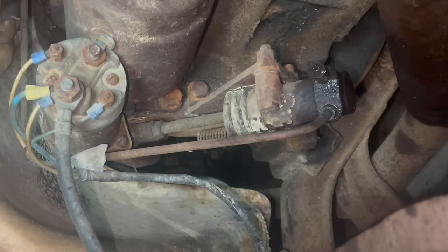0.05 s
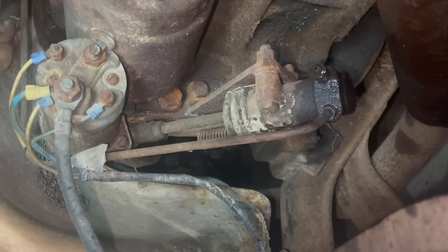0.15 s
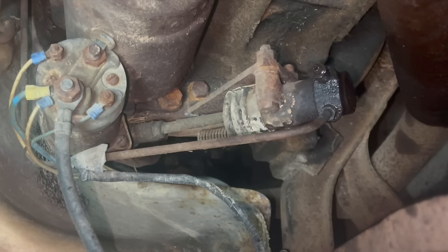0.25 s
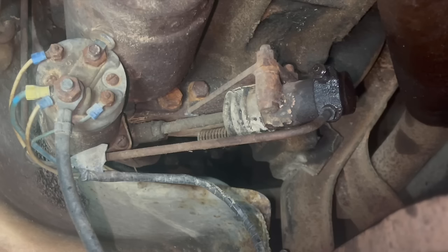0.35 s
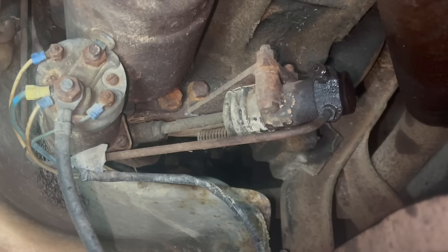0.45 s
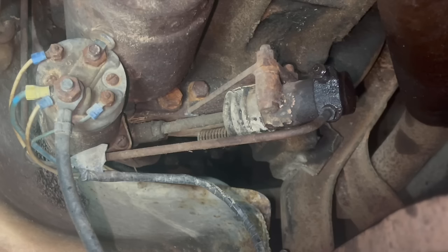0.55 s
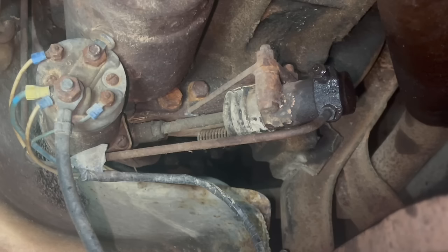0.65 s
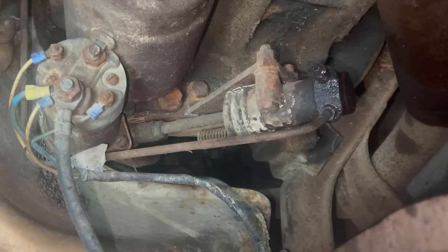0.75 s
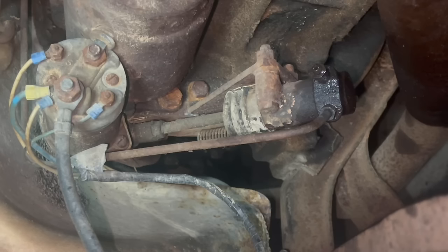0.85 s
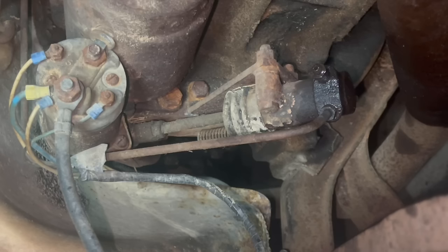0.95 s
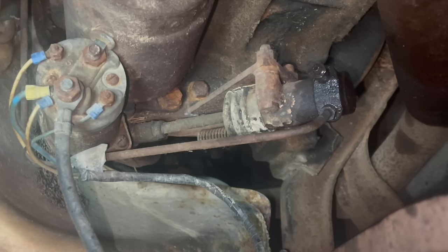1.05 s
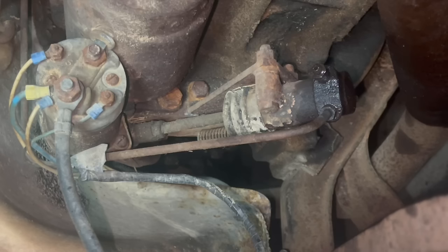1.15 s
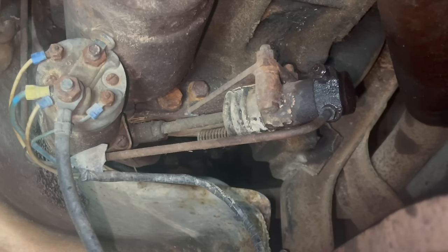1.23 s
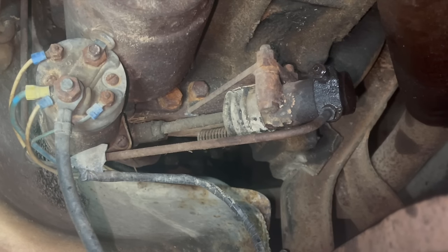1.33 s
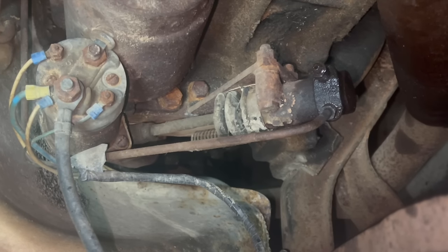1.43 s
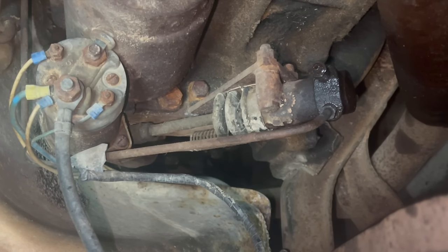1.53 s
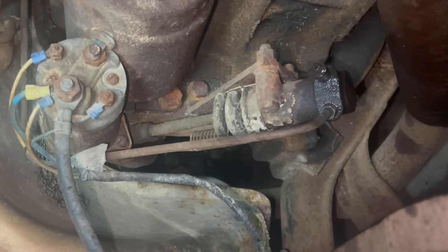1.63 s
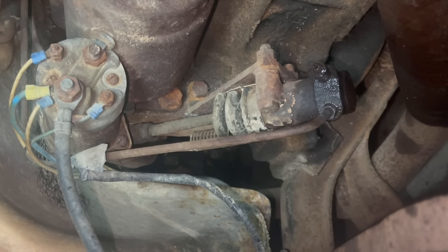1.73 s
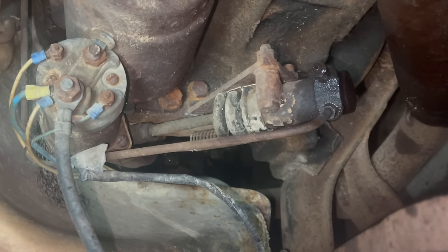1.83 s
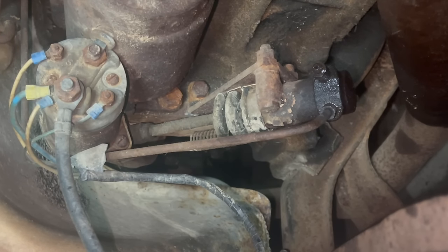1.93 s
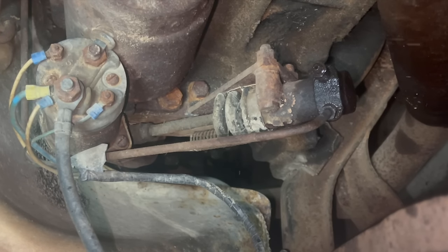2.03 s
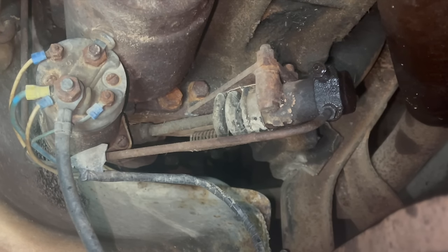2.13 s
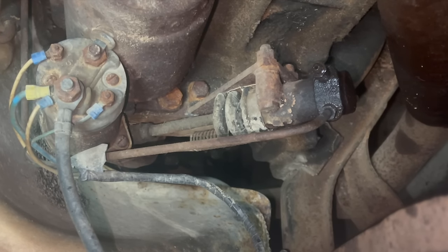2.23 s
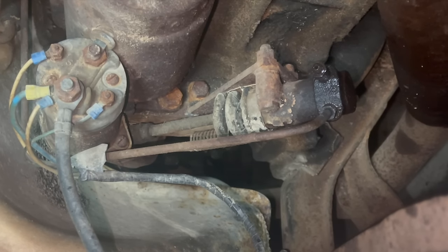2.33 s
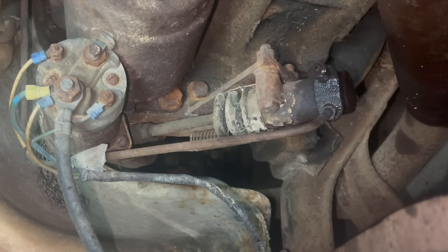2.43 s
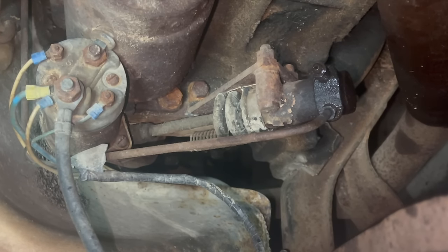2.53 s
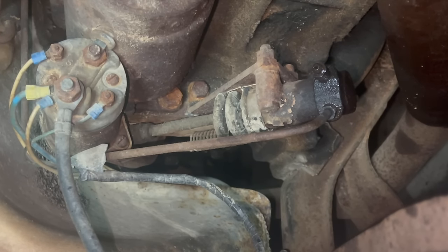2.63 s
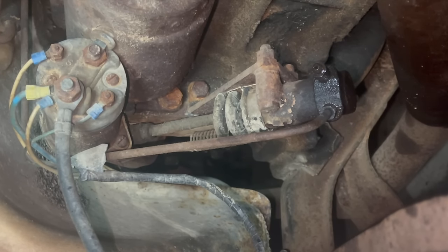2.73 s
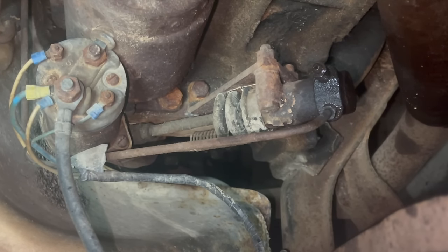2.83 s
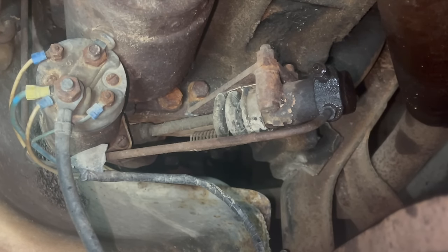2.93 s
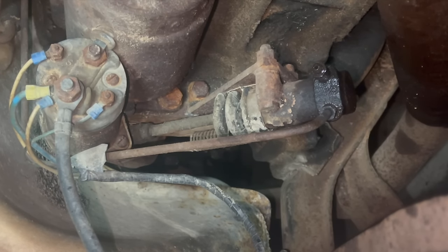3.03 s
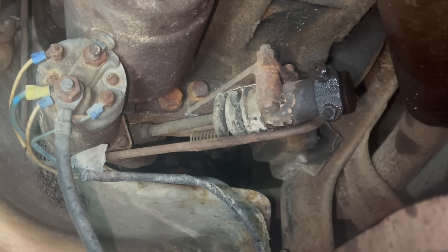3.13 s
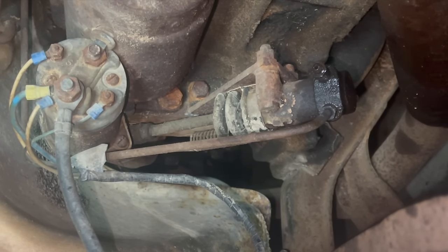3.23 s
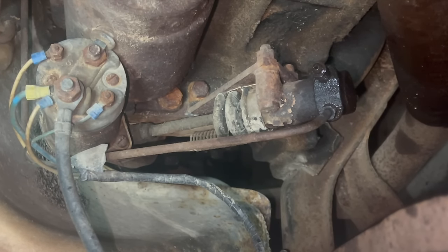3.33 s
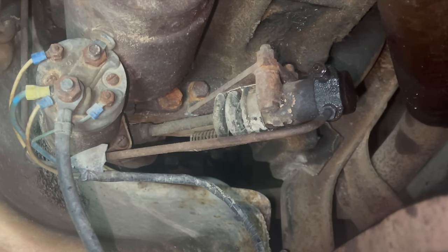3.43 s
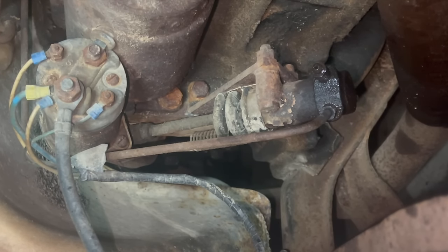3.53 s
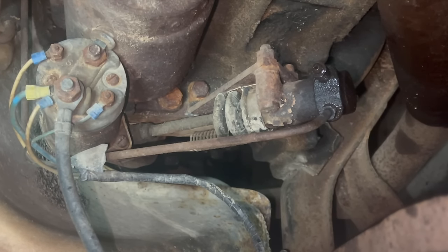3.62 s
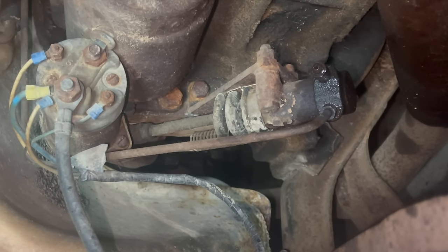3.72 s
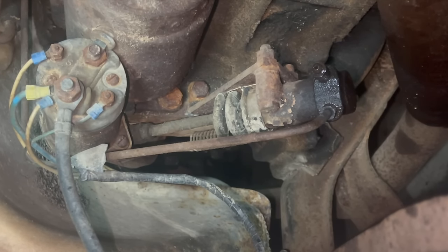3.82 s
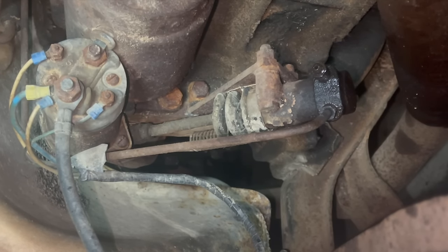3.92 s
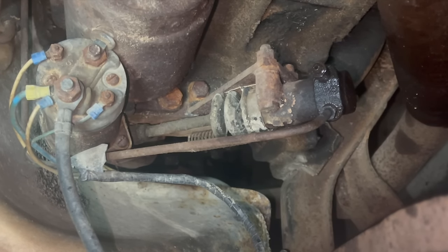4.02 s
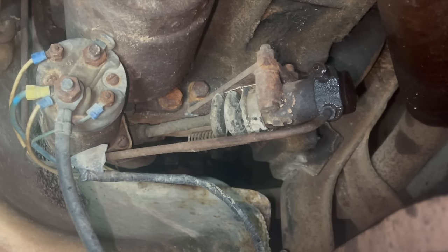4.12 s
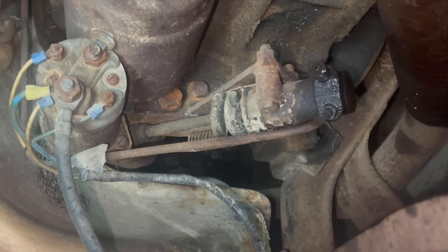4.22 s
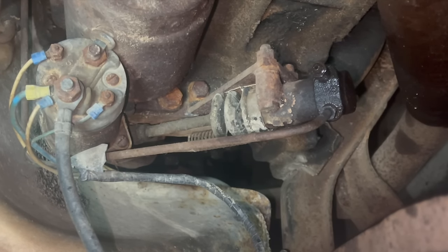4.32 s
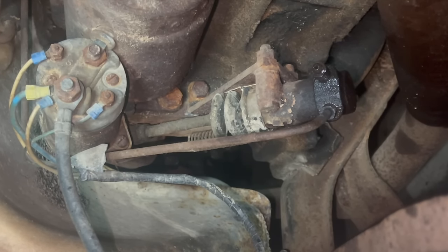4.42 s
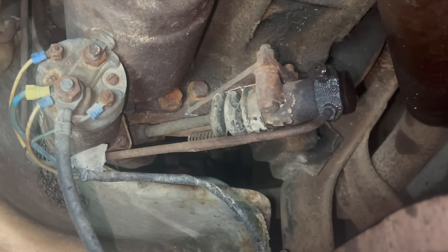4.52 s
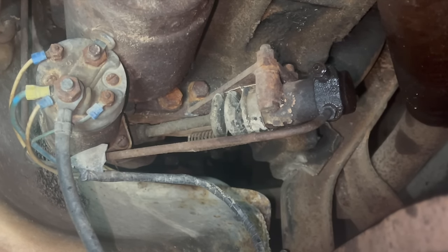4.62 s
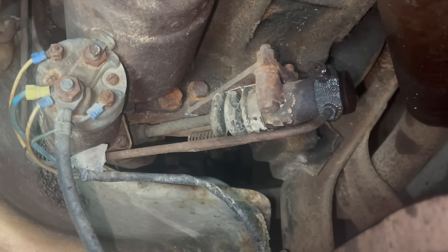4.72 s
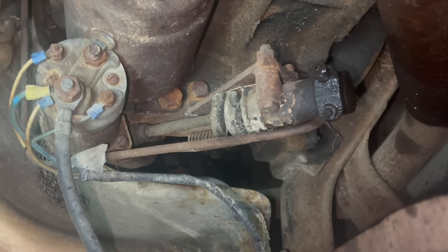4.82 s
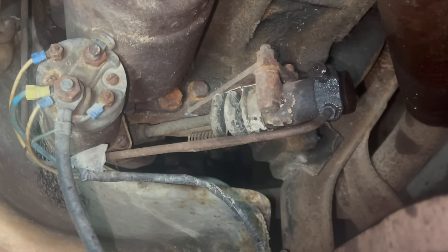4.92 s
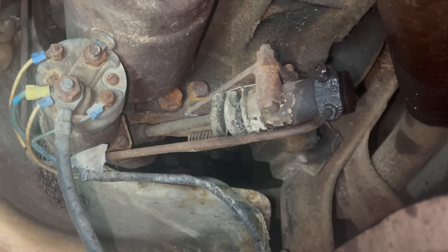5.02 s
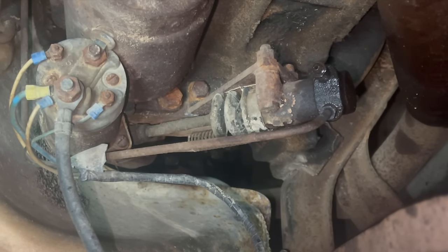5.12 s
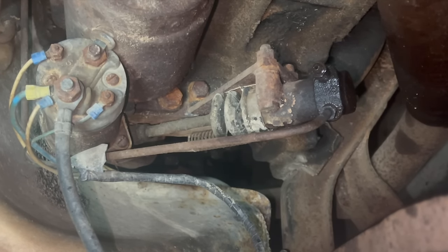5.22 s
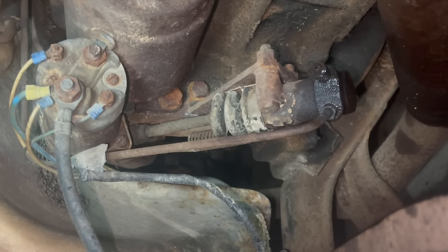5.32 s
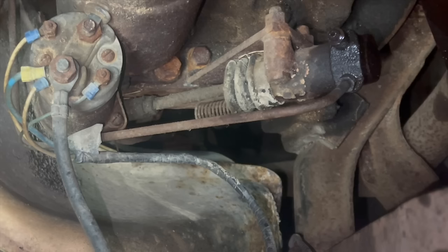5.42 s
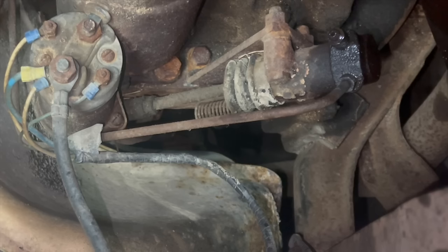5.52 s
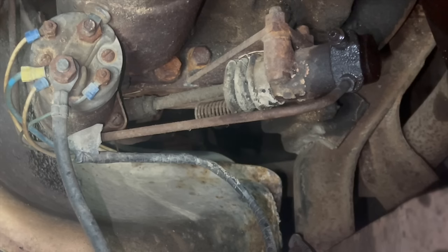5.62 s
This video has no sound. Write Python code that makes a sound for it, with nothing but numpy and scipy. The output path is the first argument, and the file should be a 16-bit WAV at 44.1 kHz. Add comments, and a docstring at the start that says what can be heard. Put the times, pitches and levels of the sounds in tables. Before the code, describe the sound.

Close under a parked vehicle, a steel clutch linkage gives one sharp, rattling clack with dull chassis thumps. Tiny spring ticks follow while a low wind gust buffets the stereo microphone. Faint clicks and soft bumps lead to a much quieter metallic return, then almost inaudible taps. Low rumble, a dull drone and thin hiss continue throughout.

```python
"""A steel clutch linkage is worked under a parked vehicle: one hard rattling knock, a softer return, light clicks.
Contact forces excite the damped modes of its parts; short bursts of contacts ring the return spring.
Dull bumps with sagging pitch thump the chassis. Behind lie coloured noises: rumble, drone, airy middle, thin hiss.
A gust of wind pushes the two microphone ports in opposite sense for a moment while the drone drops out."""
import sys
import numpy as np
from scipy import signal
from scipy.fft import rfft, irfft, next_fast_len
from scipy.io import wavfile
from scipy.ndimage import uniform_filter1d

SR = 44100
rng = np.random.default_rng(int(sys.argv[2]) if len(sys.argv) > 2 else 0)


def master_out(mix):
    """Clip the mix to full scale and print it as 16-bit PCM to the path in sys.argv[1]."""
    frames = np.transpose(np.atleast_2d(mix))
    ceiling = np.clip(frames, -1, 1)
    pcm = np.round(ceiling * 32767).astype(np.int16)
    wavfile.write(sys.argv[1], SR, pcm)


N = 249606  # samples

# Steel-on-steel blows: t/s, relative level/dB, brightness/dB, bracket share/dB.
# Brightness above 0: the blow lands nearer the clevis pin; below 0: nearer the housing.
BLOWS = [(1.378, -26.5, 7.5, -2), (1.381, -32, -5.5, 6), (1.387, -28.5, 8, 1), (1.397, -23, 2, -7),
         (1.403, -29, 0.5, -10), (1.414, -31, -2, -3), (1.423, -37, -2, -2), (1.434, -30.5, -1, 3),
         (1.449, -32.5, -3, 7.5), (1.463, -33, -2, 3), (1.475, -36.5, 3.5, 10.5), (1.483, -45, -5, 1),
         (2.74, -66, -15, 15), (2.923, -53.5, -6, 0), (2.935, -56, -6, 6), (3.046, -50, 9, 0),
         (3.055, -58, 5, 2), (3.065, -49, 6, 7), (3.888, -48.5, -11, 1.5), (3.898, -51, -5, -3),
         (3.908, -45, -8, -1), (3.912, -34, 0, -6), (3.916, -41.5, -8, -8), (3.919, -50, -6, -5),
         (3.942, -42.5, -4, 1), (3.949, -52, -9, -6), (3.974, -62, 2, 0), (4.256, -54, -5, -7),
         (5.142, -62, 0, -6), (5.385, -60, 0, 0)]
# Chatter of the sliding rod: start t/s, rise t/s, hold t/s, relative level/dB
SLIDES = [(1.373, 0.0047, 0.12, -43), (3.894, 0.022, 0.024, -50.5)]
# Share of each part in the chatter (rod, housing, pin, bracket, chassis):
# level/dB, fading once the rod stops/(dB per s)
SLIDE_SHARES = [(-0.5, 700), (4, 274), (1, 600), (5, 250), (18.5, 156)]
# The single sharp push that starts each blow (rod, housing, pin, bracket): level/dB
STRIKE_DB = [18.9, 16.6, 16.7, 16.3]
# Modes of the linkage, its spring and the chassis: f/Hz, width/Hz, relative level/dB
ROD_MODES = [(5440, 35, -5), (5670, 40, -1), (5950, 140, -1), (6280, 90, 5), (6380, 90, 4), (6640, 60, 3),
             (6830, 70, -2), (7080, 60, -4), (7300, 60, -2), (7760, 60, -5), (8110, 190, -5)]
HOUSING_MODES = [(1070, 32, 2), (1203, 32, -4), (1272, 35, -7), (1390, 70, -4), (1518, 70, -5),
                 (1660, 90, -6), (1850, 70, -3), (2180, 71, -8), (2420, 85, -8), (2660, 45, -8),
                 (2910, 80, -5), (3150, 150, -11), (3470, 90, -12), (3750, 150, -11), (3980, 80, -12)]
PIN_MODES = [(4260, 460, -6), (6640, 81, -3), (7460, 110, -13), (8270, 190, 12), (8500, 130, 9),
             (9950, 93, 14.5), (10590, 180, 11), (11260, 170, 3.5), (12100, 500, 14), (12600, 230, 7),
             (14300, 750, -32)]
BRACKET_MODES = [(400, 25, -4), (477, 22, -5), (555, 20, -6), (620, 30, -10), (730, 18, 2), (801, 18, -3),
                 (899, 20, -4), (965, 25, -9)]
SPRING_MODES = [(4100, 500, -6), (5700, 900, -11), (7300, 300, -7), (8050, 250, 4), (9100, 700, 4),
                (10000, 350, 8), (11500, 900, 2), (12800, 900, 2), (14500, 1200, -4)]
CHASSIS_MODES = [(63.2, 4.6, 17.5), (130, 7, 13), (178.2, 12.5, 6.5), (210.6, 15, -3.5),
                 (296.4, 15.4, -0.5), (352, 16, -17), (391, 19, -8), (465, 50, -17.5)]
# Spectrum of the rod's many blurred modes: f/Hz, relative level/dB
ROD_WASH = [(2000, -8), (3200, -15.5), (3800, -22.5), (4500, -2.5), (6300, -11.5), (8500, 5.5),
            (10500, -29), (12000, -57)]
# Snaps of the return spring on its hook: t/s, relative level/dB
SPRING_TICKS = [(1.8925, -32), (1.8958, -35), (1.8987, -34), (1.9022, -38), (1.9045, -41), (1.911, -46),
                (2.159, -48)]
# Dull bumps through the chassis: t/s, peak level/dB, initial f/Hz, t60/s
THUMPS = [(1.388, -19.5, 177, 0.13), (1.389, -26, 300, 0.17), (1.422, -21.5, 295, 0.058),
          (1.442, -19.5, 115.2, 0.18), (1.471, -29, 325, 0.047), (1.497, -33, 397, 0.12),
          (1.463, -16, 125.4, 0.075), (1.499, -17.5, 65, 0.22), (1.536, -26, 92.2, 0.31),
          (1.614, -21.5, 71, 0.073), (1.655, -28, 107, 0.12), (1.708, -37, 269, 0.08),
          (1.762, -25.5, 66.5, 0.11), (2.011, -28.5, 77.5, 0.099), (2.178, -20.5, 62.4, 0.16),
          (2.287, -32, 57.7, 0.18), (2.367, -22.5, 73, 0.066), (2.488, -23.5, 62.6, 0.051),
          (2.985, -29.5, 92, 0.11), (3.484, -17, 65, 0.084), (3.484, -31.5, 233, 0.06),
          (3.539, -24.5, 80, 0.044), (3.564, -27.5, 119, 0.046), (3.636, -18.5, 74, 0.046),
          (4.097, -27, 127, 0.087), (4.232, -29.5, 71, 0.16), (4.434, -29, 97.6, 0.17),
          (4.724, -32.5, 72.4, 0.27), (5.163, -34, 310, 0.1), (5.172, -27.5, 155, 0.075),
          (5.198, -33, 154, 0.081), (5.225, -31, 91, 0.077), (5.326, -32, 57, 0.13)]
# Colour of the wind: f/Hz, relative level/dB per Hz
GUST_COLOUR = [(25, -40), (60, 1), (110, 4.5), (200, -8), (400, -13), (800, -16), (1300, -37), (2000, -64),
               (3000, -88)]
# Background course: t/s, rumble level/dB, drone level/dB, airy middle level/dB
BACKGROUND_LEVELS = [(0, -41, -41, -51), (.44, -43.5, -42.5, -51), (.88, -39, -41, -50.5),
                     (1.35, -40, -42.5, -52), (1.52, -39, -38.5, -53), (1.76, -40.5, -44, -52.5),
                     (2.25, -35.5, -42.5, -52.5), (2.63, -41, -43.5, -53), (3.0, -38, -42.5, -55),
                     (3.56, -38, -44, -56.5), (3.9, -38, -41.5, -54), (4.4, -41.5, -41.5, -55.5),
                     (4.8, -40, -41.5, -57), (5.22, -38.5, -39, -57.5), (5.37, -34, -42.5, -58.5),
                     (5.42, -41.5, -47.5, -60), (5.66, -45.5, -48.5, -58.5)]
# Colours of the background noises: f/Hz, relative level/dB per Hz
RUMBLE_COLOUR = [(20, -15), (35, 7.5), (55, 16.5), (70, 16.5), (110, 5), (170, 1), (260, -38), (400, -83)]
DRONE_COLOUR = [(50, -60), (80, -22.5), (140, 4), (200, -1.5), (320, -8.5), (500, -13), (800, -15),
                (1100, -21), (1500, -59), (2200, -83)]
AIR_COLOUR = [(400, -30), (800, 0), (1150, 4.5), (1700, 0), (2200, -4), (3500, -9.5), (5000, -19.5),
              (7000, -49), (9000, -71)]
HISS_COLOUR = [(2500, -60), (3500, -30), (5500, -18), (7000, -17), (7900, -12), (9300, -11), (9700, -3),
               (10200, -7), (10600, 0), (11200, -7), (12700, -7), (13150, -22), (15000, -22)]
# Likeness of the field at the two ports (treble, near linkage, background): f/Hz, likeness (clipped to 0-1)
SAME_TOP = [(4800, .9), (5150, .5), (5450, 1), (6800, 1), (7300, .6), (8000, .85), (8400, 1), (9500, 1),
            (10300, .9), (11300, .85), (11600, 1)]
NEAR_LIKENESS = [(60, 1.0), (260, 1.0), (520, 0.59), (900, 0.67), (1700, 0.55), (2400, 0.79), (3400, 0.22),
                 (4400, 0.27)] + SAME_TOP[:6] + [(8400, 1.0), (9500, 0.94)] + SAME_TOP[8:]
FAR_LIKENESS = [(60, 1.5), (250, 0.85), (520, 0.51), (900, 0.04), (1300, 0.65), (1800, 0.8), (2300, -0.16),
                (3400, 0.3), (4400, -0.25)] + SAME_TOP
# Phase by which the left port leads (background, near linkage): f/Hz, phase/rad
LEAD = [(0, 0), (400, -.2), (900, 1.6), (1300, 2.3), (1500, .1), (2000, .6), (3100, 2.8), (3700, 1.2),
        (4800, 3.14), (5050, 4), (5400, 6.283), (6800, 6.283), (7300, 7.4), (8400, 9.425), (9500, 9.425),
        (10300, 10.4), (11500, 12.3), (11700, 12.566), (13500, 12.566), (14500, 15.2), (15200, 15.7)]
NEAR_LEAD = [(0, 0), (860, .5), (1460, -.3), (2240, 1.1), (3000, 2), (3700, .6), (4310, 1.5)] + LEAD[8:]
# Balance of the ports: f/Hz, left minus right level/dB
NEAR_BALANCE = [(60, 0.5), (180, -2), (350, -2.5), (600, -4), (1000, 1.5), (1600, 1), (2600, 0.5),
                (4000, 0)]
FAR_BALANCE = [(60, -.5), (180, -2.5), (400, -5), (700, -4), (1000, 0), (1600, 4), (2200, 0)]
# Overall response of the heard sound: f/Hz, level/dB; above about 11.7 kHz the treble dips in uneven gaps
HEARD_RESPONSE = [(12, -29), (30, -16.5), (50, -0.5), (11250, -3.5), (11700, -22), (12750, -18), (13150, -27),
                  (15600, -7)]

HIT_RISE_S, HIT_T60_S = 0.001, 0.038
CRACK_DB, CRACK_T60_S = -32, 0.0045  # a weak, faster-fading addition to each blow
HOUSING_DB, PIN_DB, BRACKET_DB = -3, -1.5, -2.5  # against the rod
SLIDE_SAG_DB_PER_S = 47  # while the rod slides
TICK_T60_S = 0.013
RING_DB, RING_DB_PER_OCTAVE = -16, 7.5  # chassis drive against a 100 Hz bump; higher bumps drive it more
GUST_S, GUST_DB = 1.94, -35  # top of the gust
GUST_RISE_S, GUST_FALL_S = 0.31, 0.33  # times in which it gains or loses 10 dB next to its top
DROPOUT_S, DROPOUT_HALF_S, DROPOUT_DB = 2.035, 0.3, 19.5  # the drone drops out while the gust blows
AIR_SHARE = 0.092  # fraction of that dip, in dB, shared by the airy middle
HISS_DB = -52
EDGE_HZ = 15700  # upper band limit


def gain_of(db):
    """Level to amplitude: 20 dB is a factor of ten."""
    return 10 ** (np.asarray(db) / 20)


def evened(x):
    """Normalization to unit root mean square."""
    return x / np.sqrt(np.mean(abs(x) ** 2) + 1e-20)


def read(points, hz):
    """Linear interpolation on a logarithmic frequency axis."""
    f, value = np.transpose(points)
    return np.interp(np.log(hz + 1), np.log(f + 1), value)


def add(mix, s, sound):
    """Superposition of a signal from time s onward."""
    part = mix[..., round(s * SR):][..., :sound.shape[-1]]
    part += sound[..., :part.shape[-1]]


def response(modes, wash=None, wash_db=0):
    """Modal superposition: decaying sines, with a short wash for blurred modes, give a unit-energy response."""
    t = np.arange(4096) / SR
    h = np.zeros(len(t))
    for k, (hz, width, db) in enumerate(modes):
        decay = np.sqrt(width) * np.exp(-np.pi * width * t)  # the root evens out the energy of the modes
        h = h + (-1) ** k * gain_of(db) * decay * np.sin(2 * np.pi * hz * t)
    h = h / np.linalg.norm(h)
    if wash:
        hz = np.linspace(0, SR / 2, 129)
        squared = gain_of(2 * read(wash, hz)) + 1e-7  # minimum_phase takes the square root
        taps = signal.minimum_phase(signal.firwin2(511, hz, squared, fs=SR))
        taps = gain_of(wash_db) * taps / np.linalg.norm(taps)
        h = h + np.pad(taps, (0, 4096 - len(taps)))
    return h / np.linalg.norm(h)


def noise(layers, patchy_db):
    """Random-spectrum synthesis: two independent noises share layers, each a colour on a level curve."""
    frames, hz = N // 256 + 5, np.fft.rfftfreq(1024, 1 / SR)
    a, b, c, d, patches = rng.standard_normal((frames, 513, 5)).T
    # smooth level patches over frequency, then time
    patches = uniform_filter1d(patches, size=8, axis=0)
    patches = evened(uniform_filter1d(patches, size=10, axis=1))
    t, power = np.arange(frames) * 256 / SR, 0
    for colour, s, db in layers:
        shape = evened(gain_of(read(colour, hz)))
        power = power + np.outer(shape, gain_of(np.interp(t, s, db))) ** 2
    white = np.array([a + 1j * b, c + 1j * d])
    scale = np.std(signal.istft(white[0], nperseg=1024, noverlap=768)[1])
    spectra = white * np.sqrt(power) * gain_of(patchy_db * patches) / scale
    return signal.istft(spectra, nperseg=1024, noverlap=768)[1][:, :N]


def linkage():
    """Forced modal vibration: blows excite rod, housing, pin and bracket; chatter excites the chassis too."""
    force, strikes = np.zeros((5, N)), np.zeros((5, N))  # on each of the five parts
    t = np.arange(SR // 2) / SR
    fade = gain_of(-60 * t / HIT_T60_S) + gain_of(CRACK_DB - 60 * t / CRACK_T60_S)
    fade = np.minimum(t / HIT_RISE_S, 1) * fade
    for s, db, bright_db, bracket_db in BLOWS:
        low_db = db - bright_db
        housing_db = low_db + HOUSING_DB
        pin_db = db + PIN_DB + bright_db
        level = gain_of([[db], [housing_db], [pin_db], [low_db + BRACKET_DB + bracket_db]])
        add(force[:4], s, level * fade)
        add(strikes[:4], s, level * gain_of(STRIKE_DB)[:, None])
    part_db, fading_db = np.transpose(SLIDE_SHARES)[..., None]
    for s, rise, hold, db in SLIDES:
        sag_db = SLIDE_SAG_DB_PER_S * np.minimum(t, rise + hold)
        stop_db = fading_db * np.maximum(t - rise - hold, 0)
        add(force, s, np.minimum(t / rise, 1) ** 2 * gain_of(db + part_db - sag_db - stop_db))
    # tiny contacts: the force level jumps about once a millisecond
    jumps = gain_of(3.9 * rng.standard_normal((2, 1, N // 40 + 1))).repeat(40, axis=2)[..., :N]
    grit = evened(rng.standard_normal((2, 5, N)) * jumps)
    bodies = [response(ROD_MODES, ROD_WASH, wash_db=1.0), response(HOUSING_MODES),
              response(PIN_MODES), response(BRACKET_MODES), response(CHASSIS_MODES)]
    ringing = signal.fftconvolve(grit * force + strikes, np.array([bodies]), axes=2)
    return ringing[..., :N].sum(axis=1)


def spring():
    """Burst excitation: each tick is a very short random contact force that rings the spring's modes."""
    force, t = np.zeros(N), np.arange(SR // 10) / SR
    for s, db in SPRING_TICKS:
        add(force, s, gain_of(db - 60 * t / TICK_T60_S))
    contacts = force * rng.standard_normal((2, N))
    return signal.fftconvolve(contacts, response(SPRING_MODES)[None], axes=1)[:, :N]


def thumps():
    """Damped oscillation: low cycles swell in milliseconds and sag in pitch; a random force rings the chassis."""
    bumps, force, t = np.zeros(N), np.zeros(N), np.arange(SR // 3) / SR
    for s, db, hz, t60 in THUMPS:
        shape = (1 - np.exp(-t / 0.0022)) ** 2 * gain_of(-60 * t / t60)
        shape = shape / shape.max()
        add(bumps, s, gain_of(db) * shape * np.sin(2 * np.pi * hz * t * (1 - 1.0 * t)))
        drive_db = db + RING_DB + RING_DB_PER_OCTAVE * np.log2(hz / 100)
        add(force, s, gain_of(drive_db) * shape)
    upper = response(CHASSIS_MODES[2:])  # without the two lowest modes
    ringing = signal.fftconvolve(force * rng.standard_normal((2, N)), upper[None], axes=1)[:, :N]
    return bumps + ringing


def gust():
    """Antiphase pressure: wind noise acts mostly in opposite sense on the ports, with a small common part."""
    t = np.arange(0, N / SR, .01)
    flank_s = np.where(t < GUST_S, GUST_RISE_S, GUST_FALL_S)
    db = GUST_DB - 10 * ((t - GUST_S) / flank_s) ** 2
    opposite, common = noise([(GUST_COLOUR, t, db)], patchy_db=2.0)
    return np.array([opposite + 0.11 * common, -opposite + 0.11 * common])


def background():
    """Power addition of noises: rumble, drone and airy middle drift in level; the hiss has a steady level."""
    s, rumble_db, drone_db, air_db = np.transpose(BACKGROUND_LEVELS)
    t = np.arange(0, N / SR, .01)
    dropout_db = DROPOUT_DB * np.clip(1 - abs(t - DROPOUT_S) / DROPOUT_HALF_S, 0, 1)
    rumble = (RUMBLE_COLOUR, s, rumble_db)
    drone = (DRONE_COLOUR, t, np.interp(t, s, drone_db) - dropout_db)
    air = (AIR_COLOUR, t, np.interp(t, s, air_db) - AIR_SHARE * dropout_db)
    hiss = (HISS_COLOUR, [0], [HISS_DB])
    return noise([rumble, drone, air, hiss], patchy_db=1.53)


def ports(pair, likeness, phases, balance):
    """Partial coherence: the ports receive partly different fields, offset in phase and level by frequency."""
    size = next_fast_len(N + 4096)
    hz, (a, b) = np.fft.rfftfreq(size, 1 / SR), rfft(pair, size)
    same = np.clip(read(likeness, hz), 0, 1)
    tilt = gain_of(read(balance, hz) / 2)  # half the difference on each side
    lead = np.exp(.5j * np.interp(hz, *np.transpose(phases)))
    left = a * tilt * lead
    right = (same * a + np.sqrt(1 - same ** 2) * b) / tilt / lead
    return irfft(np.array([left, right]), size)[:, :N]


def scene():
    """Linear superposition: sources and background pass through the port pair; wind acts on it directly."""
    near = ports(linkage() + spring() + thumps(), NEAR_LIKENESS, NEAR_LEAD, NEAR_BALANCE)
    far = ports(background(), FAR_LIKENESS, LEAD, FAR_BALANCE)
    return near + far + gust()


def record(dry):
    """Linear filtering: an overall response weakens the deepest bass and leaves the top treble uneven and
    gapped; a low-pass sets the band limit."""
    hz = np.linspace(0, SR / 2, 4097)
    shaping = signal.firwin2(4095, hz, gain_of(read(HEARD_RESPONSE, hz)), fs=SR)
    heard = signal.oaconvolve(dry, shaping[None], "same")
    band_limit = signal.firwin(511, EDGE_HZ, window=("kaiser", 9), fs=SR)
    return signal.oaconvolve(heard, band_limit[None], "same")


dry = scene()
out = record(dry)
master_out(out)
```